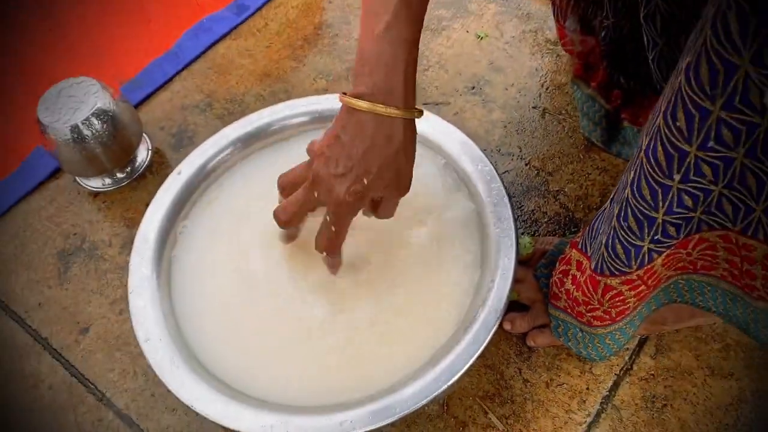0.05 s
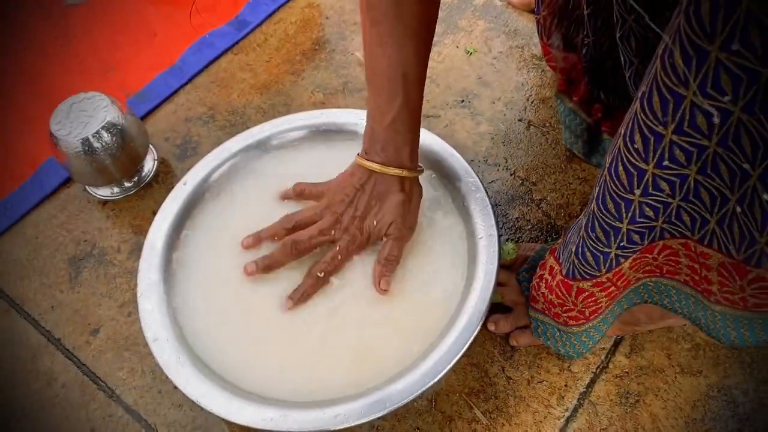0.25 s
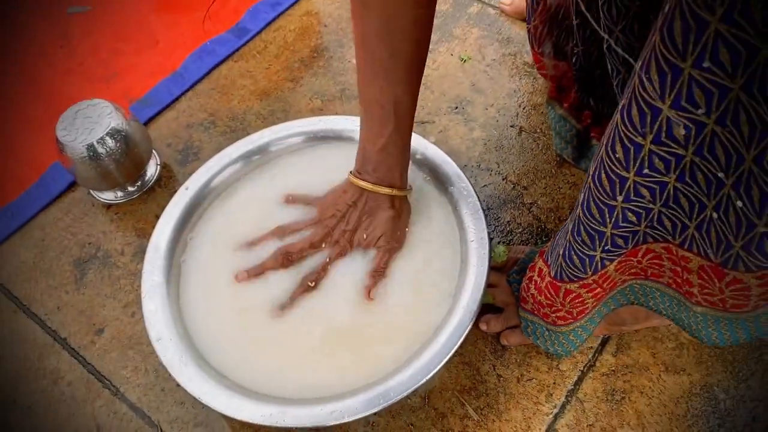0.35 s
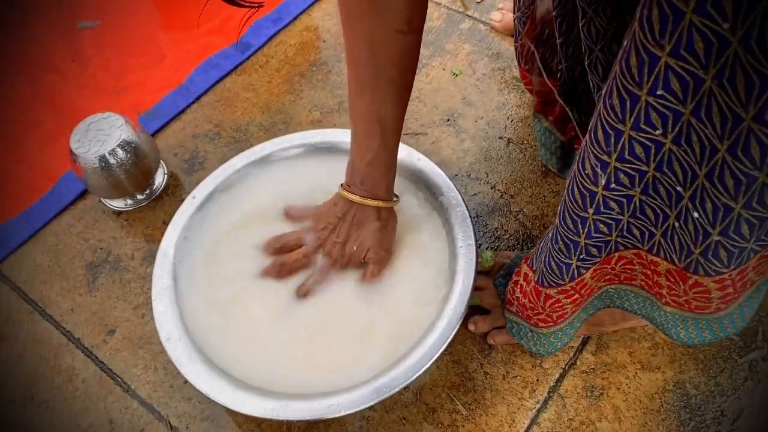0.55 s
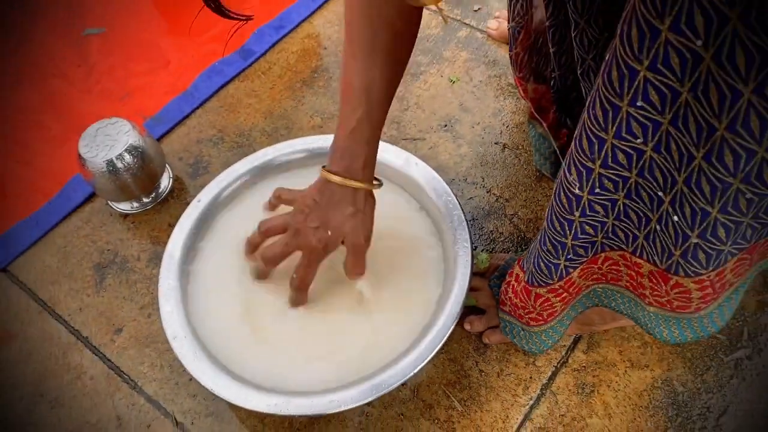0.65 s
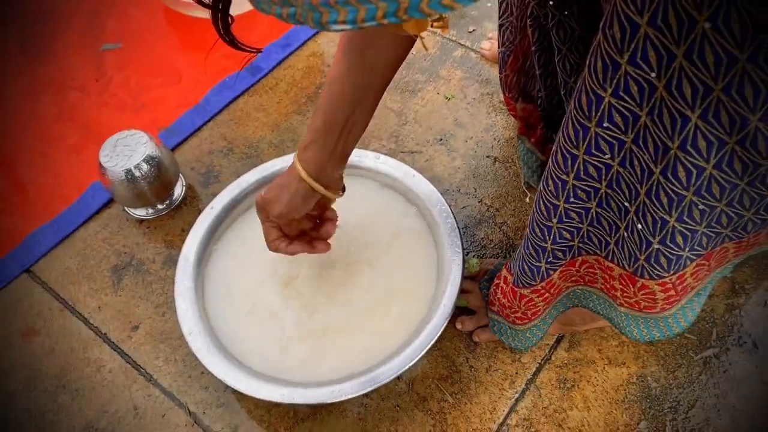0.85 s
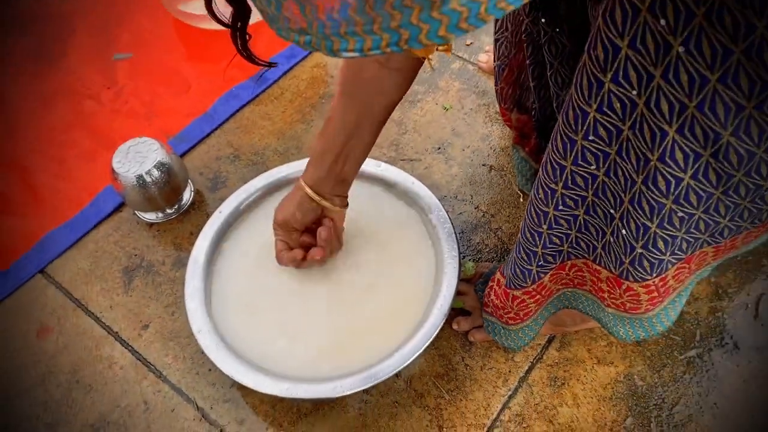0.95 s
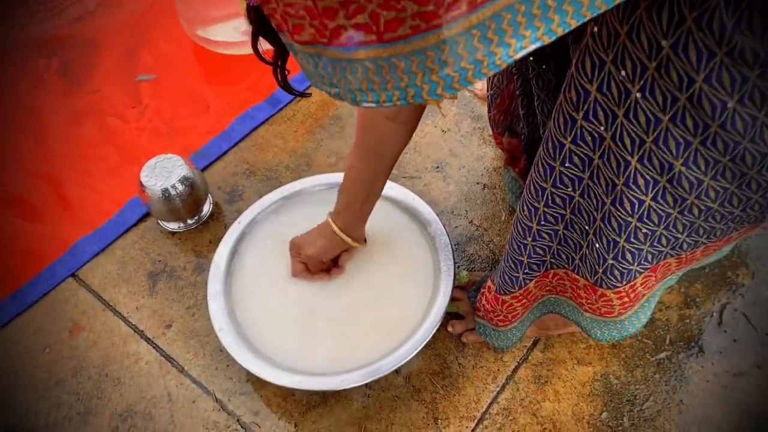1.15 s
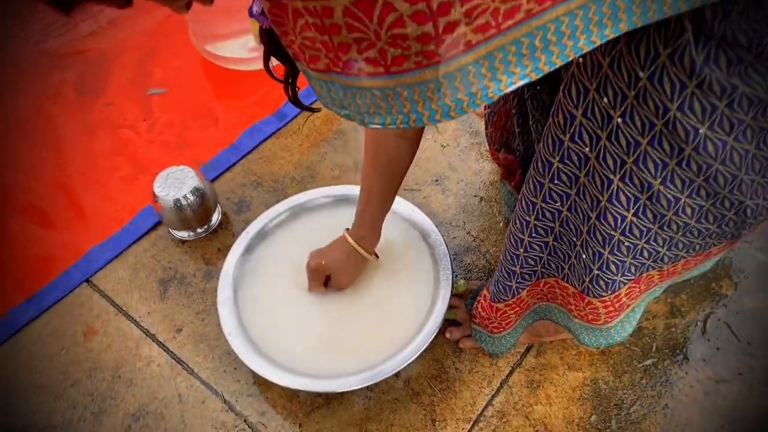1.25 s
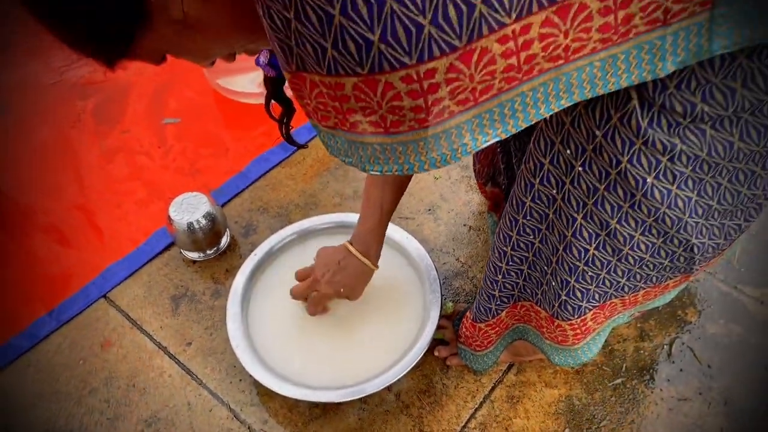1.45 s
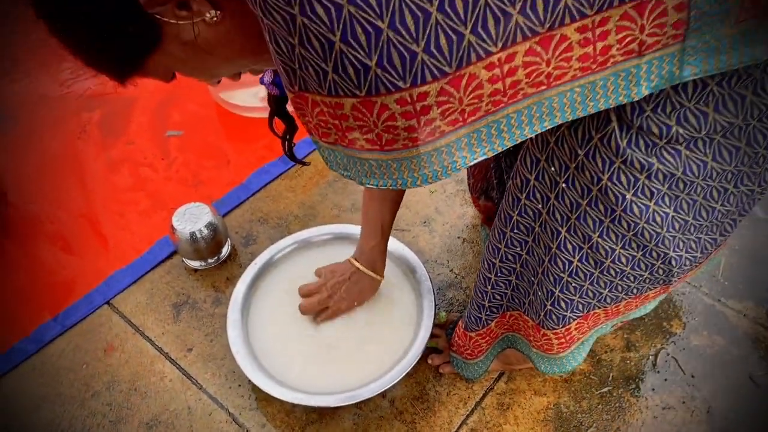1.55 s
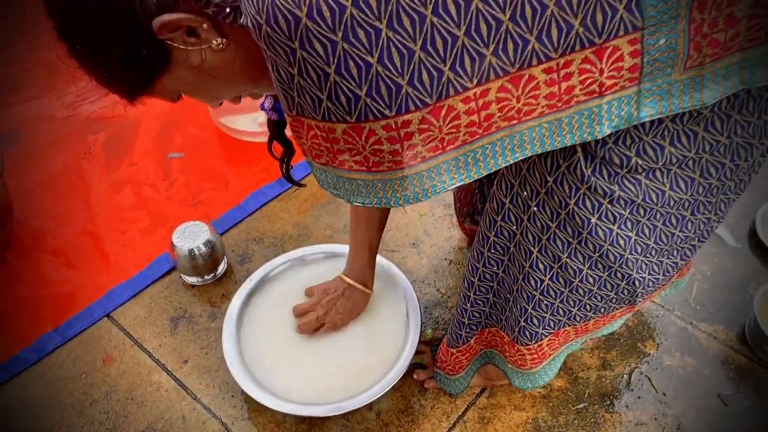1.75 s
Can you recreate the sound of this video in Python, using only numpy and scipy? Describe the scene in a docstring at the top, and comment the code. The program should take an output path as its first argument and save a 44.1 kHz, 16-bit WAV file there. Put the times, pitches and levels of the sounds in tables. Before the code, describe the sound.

Wet rice swirled and squeezed by hand in a steel basin, one hard tap early on

```python
"""Outdoors, close under a hand-held phone, a hand swirls and squeezes wet rice in a steel basin over low wind.
At 0.2 s a hard tap on the case, by the left port, thumps; slosh, swish and hiss then dip briefly.
Crackles come before and after, bubbles only after; weaker taps follow up to 0.86 s; gurgles come and go.
Grainy noise makes swish, water and wind; noise bursts crackle, damped tones are bubbles, impulses are taps.
Last, the recorder's phase-turning filters smear each tap into a falling thump."""
import sys
import numpy as np
from scipy import signal
from scipy.fft import rfft, irfft
from scipy.io import wavfile
from scipy.ndimage import uniform_filter1d

SR = 44100
rng = np.random.default_rng(int(sys.argv[2]) if len(sys.argv) > 2 else 0)


def magnitude_from_level(level_db):
    """Linear magnitude for a level in decibels (20 dB per decade)."""
    exponent = np.asarray(level_db, float) / 20
    return 10 ** exponent


def unload_wav(signal):
    """Save mono or channel-first audio to the path in sys.argv[1] as 16-bit WAV at rate SR, clipped to [-1, 1]."""
    wavfile.write(
        sys.argv[1],
        SR,
        np.round(np.clip(np.atleast_2d(signal).T, -1, 1) * 32767).astype(np.int16),
    )


N = 79380  # samples, 1.8 s
T = np.arange(N) / SR  # s
F = np.arange(N // 2 + 1) * SR / N + 1e-3  # Hz, kept off zero for the logarithms

# Noise colours of rice, water and wind: f/Hz, relative level/dB
SWISH_COLOUR = [(900, -8), (1400, -3.5), (2000, -1.5), (3500, -5.5), (4600, -11.5), (6000, -15)]
HISS_COLOUR = [(4000, -8.5), (5500, -3), (7000, -1), (8600, -3), (10800, -4), (12300, -7.5), (13200, -21.5),
               (14900, -6), (15800, -19.5)]
SLOSH_COLOUR = [(280, -9), (450, -6.5), (700, -0.5), (1050, -3.5), (1500, -8)]
GURGLE_COLOUR = [(120, -9), (175, 0.5), (230, -3.5), (310, -12)]
WIND_COLOUR = [(25, -22.5), (45, -6.5), (80, -3), (130, -3), (200, -13.5)]
# Their courses, before flicker and dip: t/s, level/dB
SWISH_COURSE = [(0, -49), (.3, -56.5), (.4, -52), (.75, -52), (1.05, -54), (1.451, -52.5), (1.8, -53)]
HISS_COURSE = [(0, -60), (1.8, -59)]
SLOSH_COURSE = [(0, -44), (0.033, -57.5), (.3, -58), (.63, -51.5), (.67, -61), (1.27, -66.5), (1.55, -59),
                (1.8, -64)]
GURGLE_COURSE = [(0, -56), (.3, -60), (.43, -53.5), (.56, -55.5), (.62, -68.5), (0.761, -62), (.82, -70.5),
                 (1.05, -73), (1.075, -61), (1.125, -62.5), (1.16, -56), (1.2, -71.5), (1.57, -69),
                 (1.6, -59.5), (1.8, -64)]
WIND_COURSE = [(0, -56), (.3, -57.5), (.42, -58), (.5, -49.5), (.6, -56.5), (.65, -63), (.7, -60.5),
               (.82, -65), (1.48, -66.5), (1.66, -56.5), (1.725, -67.5), (1.8, -46.5)]
# Dip of slosh, swish and hiss after the hardest tap: from t/s, to t/s, level/dB
DIP = (.21, .26, -6)
# Wet crackles of squeezed grains: t/s, length/s, relative level/dB, centre f/Hz
CRACKLES = [(0.12, 0.0028, -45, 8900), (.157, 0.0047, -39.5, 4640), (0.263, .0012, -26.5, 9900),
            (0.261, 0.0065, -46, 3490), (0.266, 0.0124, -44, 7000), (0.282, 0.0077, -45, 6100),
            (0.35, 0.0046, -51, 9100), (0.775, 0.038, -42, 4140), (0.962, 0.0035, -38.5, 7930),
            (0.9677, 0.0028, -35, 6500), (0.9741, 0.00205, -37, 6600), (.908, 0.011, -46, 2400),
            (1.126, 0.0098, -47.5, 3340), (1.229, 0.0073, -45, 3500), (1.704, 0.0053, -44, 4500),
            (1.631, 0.011, -46, 8000)]
# Bubbles: t/s, starting f/Hz, starting level/dB, 60 dB decay time/s
BUBBLES = [(0.2631, 6100, -31, 0.013), (.323, 700, -42.5, 0.06), (0.352, 679, -39, 0.025),
           (.412, 700, -42.5, 0.047), (0.621, 1040, -36, 0.038), (0.779, 2950, -44.5, 0.06),
           (.862, 2790, -33.5, 0.012), (1.557, 880, -41.5, 0.04), (1.592, 890, -42, 0.037)]
# Taps on the case, the hardest in the first row: t/s, relative level/dB, lift/dB, lift centre f/Hz
TAPS = [(0.2096, 16.5, 0, 3200), (.198, -9, -14, 3200), (0.2215, -37, 9, 5000), (0.248, -25.5, 25, 3330),
        (0.6797, -31.5, 26, 4000), (0.8629, -27.5, -15, 3200)]
# Ringing heard around the hardest tap, near 5.5 kHz: f/Hz, gain/dB
RING_AROUND_TAP = [(4900, 0), (5320, 9), (5470, -24), (5630, 15.5), (5900, 5), (6170, -10), (6600, 1)]
# What a tap gives the left and the right port: f/Hz, relative level/dB
TAP_LEFT = [(28, -13), (46, -22), (65, -2), (200, 1.5), (400, -3.5), (720, -10), (1080, -18), (1500, -16.5),
            (2500, -22.5), (4500, -26), (7000, -29), (8600, -36.5), (10500, -73)]
TAP_RIGHT = [(28, -13), (46, -31), (65, -4), (180, 1), (400, -2.5), (720, -20), (1080, -20), (1600, -39.5),
             (2600, -51), (7000, -46.5), (10500, -72)]
# Stereo image, that of the microphone ports only below 8 kHz:
# f/Hz, likeness (0-1), right leads/rad, left minus right/dB
STEREO = [(80, 1, 1.86, 0.5), (248.2, 0, -0.5, -0.9), (427, 0.9, 0.3, 1.5), (700, 0.1, 1.3, 2),
          (1300, 0, 2.5, 1.5), (2600, 0.09, 0.34, 2.5), (5500, 0.1, -0.6, 6), (7000, 0.3, 1.04, 0.5),
          (8130, 0.7, 3, -1), (11700, 0.94, 7, 0.5), (14100, 1, 10.5, 0), (15300, 0.87, 10.5, -7.5)]
# Phase-turning filters: turns per factor e of frequency, up to f/Hz, constant turn/turns
SMEAR = (1.17, 2500, .27)


def over_hz(table, column=1):
    """Interpolates one column of a table over log frequency."""
    rows = np.array(table, float)
    return np.interp(np.log(F), np.log(rows[:, 0]), rows[:, column])


def walk(rate_hz):
    """Random levels, each held for one period of the rate, then smoothed twice."""
    hold = int(SR / rate_hz)
    steps = np.repeat(rng.standard_normal(N // 100), hold)[:N]
    return uniform_filter1d(uniform_filter1d(steps, hold), hold)


def stereo(make):
    """Left and right spectra: a shared sound, phase-turned on the right, plus each side's own sound."""
    likeness = np.clip(over_hz(STEREO), 0, 1)
    shared, left, right = (rfft(make()) for _ in range(3))
    shared = np.sqrt(likeness) * shared
    own = np.sqrt(1 - likeness)
    turn = np.exp(1j * over_hz(STEREO, column=2))
    tilt = magnitude_from_level(over_hz(STEREO, column=3) / 2)
    return np.array([tilt * (shared + own * left), (shared * turn + own * right) / tilt])


def bed(colour, course, grain_db, flicker_db, flicker_hz):
    """Dense noise grains of uneven size, coloured, flickering about a level course."""
    draws = np.minimum(rng.exponential(size=N // 40 + 1), 3.5)
    size = magnitude_from_level(grain_db * draws).repeat(40)[:N]  # each grain is 40 samples
    lowest, highest = colour[0][0], colour[-1][0]
    skirt = np.minimum(F / lowest, 1) ** 3 * np.minimum(highest / F, 1) ** 3
    grains = stereo(lambda: size * rng.standard_normal(N))
    x = irfft(grains * magnitude_from_level(over_hz(colour)) * skirt, N)
    level_db = np.interp(T, *np.array(course).T) + flicker_db * walk(flicker_hz)
    return x / x.std() * magnitude_from_level(level_db)


def rice_swish():
    """Stirred grains rub past each other: grainy noise strongest around 2 kHz."""
    return bed(SWISH_COLOUR, SWISH_COURSE, grain_db=2.5, flicker_db=1.5, flicker_hz=43)


def rice_hiss():
    """The finest part of the rubbing: treble noise with the most uneven grains."""
    return bed(HISS_COLOUR, HISS_COURSE, grain_db=3.5, flicker_db=2.0, flicker_hz=8.7)


def crackles():
    """Squeezed wet grains spit short bursts of broad noise around each centre."""
    spectra = 0
    for start, length, db, centre in CRACKLES:
        age = np.clip(T - start, 0, 1)
        shape = magnitude_from_level(db) * (1 - np.exp(-age / 0.0002)) * np.exp(-(age / length) ** 2)
        spit = magnitude_from_level(2.7 * rng.standard_normal(N // 30 + 1)).repeat(30)[:N]
        burst = stereo(lambda: shape * spit * rng.standard_normal(N))
        spectra = spectra + burst / np.sqrt(1 + (0.74 * (F / centre - centre / F)) ** 4)
    return irfft(spectra, N)


def slosh():
    """Water moving with the rice: grainy noise in the middle range."""
    return bed(SLOSH_COLOUR, SLOSH_COURSE, grain_db=2.5, flicker_db=2.5, flicker_hz=43)


def bubbles():
    """Each bubble rings as a damped tone that rises a little."""
    left = 0
    for start, hz, db, t60 in BUBBLES:
        age = np.clip(T - start, 0, 1)
        envelope = magnitude_from_level(db - 60 * age / t60) * (1 - np.exp(-age / 0.00022))
        left = left + envelope * np.sin(2 * np.pi * hz * age * (1 + 0.029 * age / t60))
    to_right = np.exp(1j * over_hz(STEREO, column=2)) * magnitude_from_level(-over_hz(STEREO, column=3))
    return np.array([left, irfft(rfft(left) * to_right, N)])


def gurgle():
    """Water gurgles low: noise around 200 Hz that flickers strongly."""
    return bed(GURGLE_COLOUR, GURGLE_COURSE, grain_db=-1.5, flicker_db=5, flicker_hz=41)


def taps():
    """Each tap is one impulse through the case; the right port gets it duller and a little earlier."""
    lead_rad, lead_s = 0.42, 0.00025
    hits = []
    for start, db, lift_db, hz in TAPS:
        lift = lift_db / (1 + (0.76 * np.log(F / hz)) ** 2)
        hits.append(magnitude_from_level(db + lift) * np.exp(-2j * np.pi * F * start))
    # zero-phase gain, so the ringing falls before and after the hardest tap
    blows = hits[0] * magnitude_from_level(over_hz(RING_AROUND_TAP)) + sum(hits[1:])
    lead = np.exp(1j * (lead_rad + 2 * np.pi * F * lead_s))
    paths = np.array([magnitude_from_level(over_hz(TAP_LEFT)), lead * magnitude_from_level(over_hz(TAP_RIGHT))])
    return 10 * irfft(blows * paths, N)


def dip_after_tap():
    """Gain that dips briefly after the hardest tap, with softened edges."""
    start, end, db = DIP
    inside = 1. * (T > start) * (T < end)
    return magnitude_from_level(db * uniform_filter1d(inside, size=200))


def wind():
    """Wind rumbles at the phone: low noise swelling in gusts."""
    return bed(WIND_COLOUR, WIND_COURSE, grain_db=-0.2, flicker_db=-0.5, flicker_hz=70)


def scene():
    """Rice and water in the basin, taps on the phone and the wind, in stereo."""
    stirred = dip_after_tap() * (rice_swish() + rice_hiss() + slosh())
    return stirred + crackles() + bubbles() + gurgle() + taps() + wind()


def band_limit(x):
    """A steep low-pass at the top of the band."""
    return signal.sosfilt(signal.butter(12, 16940, fs=SR, output="sos"), x)


def record(dry):
    """The recorder's phase-turning filters bring the lows late; the top is cut near 15.9 kHz."""
    turns, up_to_hz, constant = SMEAR
    phase = constant - turns * np.log(F / (F + up_to_hz))  # in turns
    top_cut = 1 / (1 + (F / 15900) ** 40)
    mix = irfft(rfft(dry) * np.exp(2j * np.pi * phase) * top_cut, N)
    return band_limit(mix)


dry = scene()
out = record(dry)
unload_wav(out)
```